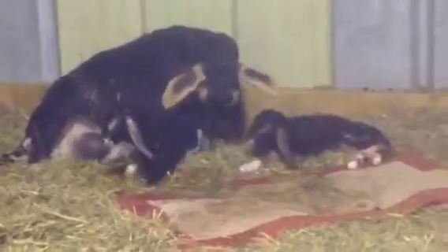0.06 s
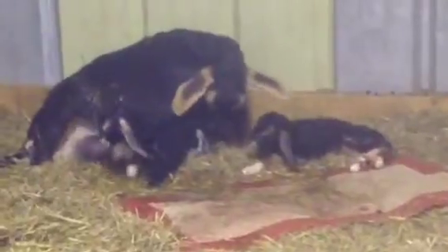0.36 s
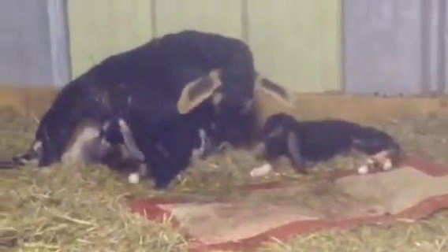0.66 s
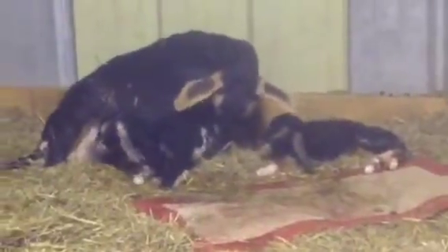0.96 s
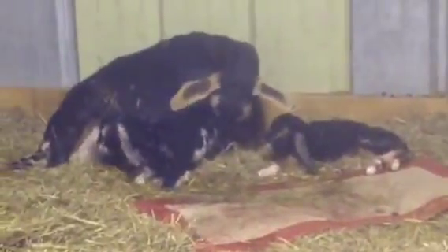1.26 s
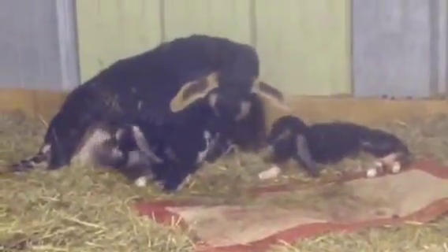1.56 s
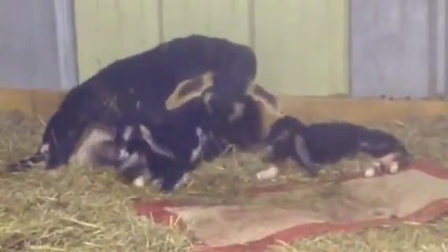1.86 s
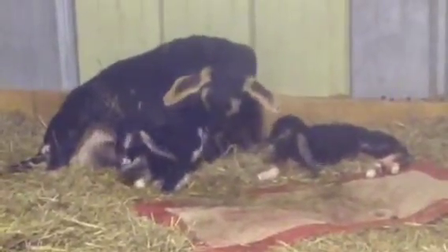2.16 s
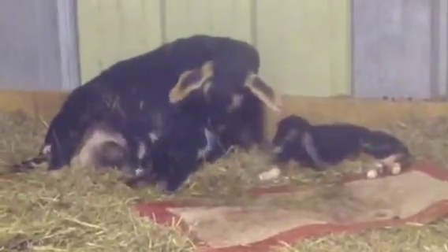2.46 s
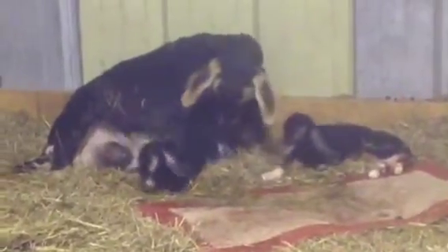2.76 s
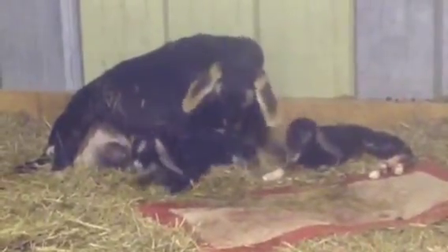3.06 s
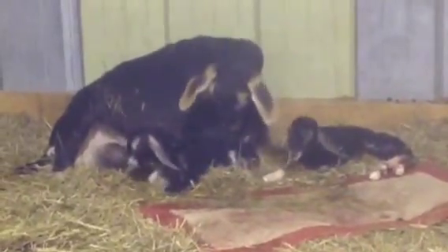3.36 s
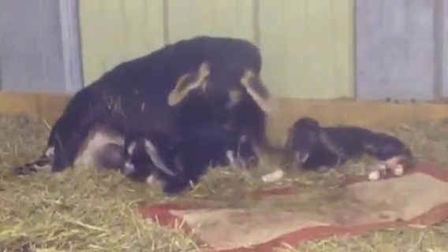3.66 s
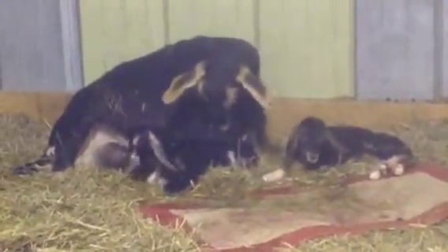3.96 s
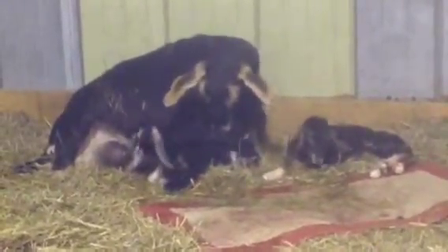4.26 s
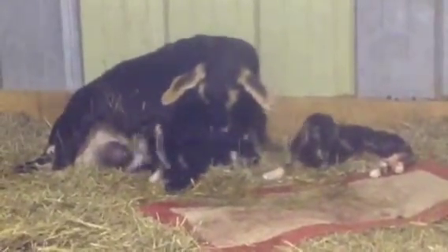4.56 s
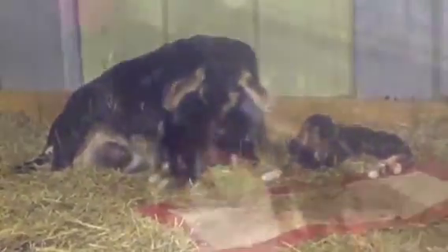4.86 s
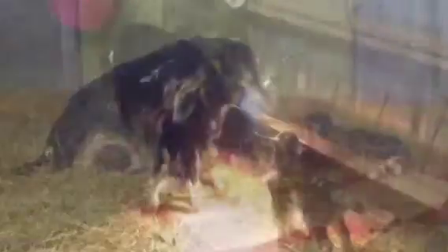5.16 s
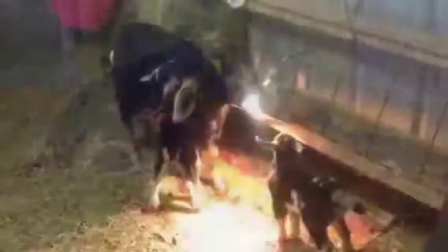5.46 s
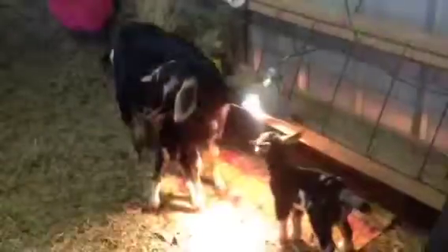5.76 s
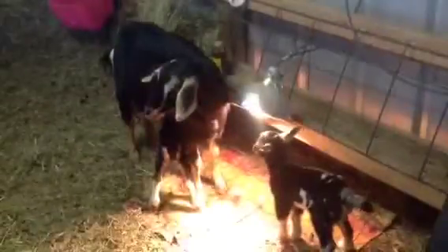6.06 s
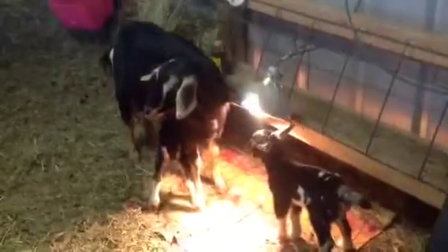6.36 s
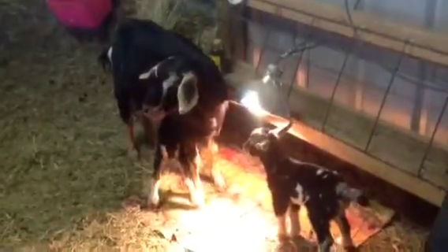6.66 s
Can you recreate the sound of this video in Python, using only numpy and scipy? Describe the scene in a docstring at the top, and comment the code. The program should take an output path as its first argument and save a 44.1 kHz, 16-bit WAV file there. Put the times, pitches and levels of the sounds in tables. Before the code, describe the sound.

A mother goat murmurs soft bleats and licks in straw while distant frogs peep; then louder barn air swells and a small bell clinks.

```python
"""A doe murmurs to her newborn kids in a straw-bedded barn pen: short, throbbing, mostly closed-mouth
bleats, glottal pulses ringing her throat, muzzle and nose. In the pen, licks smack, straw snaps and
hooves shift; far off outside, a chorus of frogs peeps. Then a louder, rustling barn air with a faint
hum swells up, and a clapper clinks four times on a small metal bell. One small microphone hears it all."""
import sys
import numpy as np
from scipy import signal
from scipy.fft import rfft, irfft, next_fast_len
from scipy.io import wavfile
from scipy.ndimage import uniform_filter1d

SR = 44100
rng = np.random.default_rng(int(sys.argv[2]) if len(sys.argv) > 2 else 0)


def generate_wav(sig):
    """Save sig (samples, or channels by samples) to the path in sys.argv[1] as 16-bit PCM at SR."""
    pcm = np.round(np.clip(np.atleast_2d(sig).T, -1, 1) * 32767).astype(np.int16)
    wavfile.write(sys.argv[1], SR, pcm)


N = 296335
TIME = np.arange(N) / SR
BUSY_FROM_S, BUSY_RISE_S = 4.719, 0.74   # the louder barn air swells up evenly, then stays

# Throbs of the doe's voice: t/s, push length/s, f/Hz, glide/(octaves per s), roughness/0-1,
# jaw opening/0-1, relative level/dB of nose, mouth and muzzle, muzzle resonance/Hz
THROBS = [(0.608, 0.054, 163.3, -3, 0.46, 0.04, -49, -50, -61, 5170),
          (.733, 0.042, 194.7, -0.8, 0.16, 0.23, -42.5, -46, -61.5, 5200),
          (0.858, 0.012, 193.6, 0.5, 0.46, 0, -49, -53.5, -76.5, 5400),
          (2.342, 0.018, 114.4, 0, 0.31, 0.37, -60.5, -68, -81, 5480),
          (2.388, 0.041, 106.8, -3, 0.66, 0.4, -55, -58.5, -71, 5370),
          (2.656, 0.047, 164.9, -1.14, 0.48, 1, -73, -66, -72, 5800),
          (2.748, 0.049, 118.1, 0.1, .42, 1, -66.5, -59, -61, 5406),
          (2.801, .048, 120.5, 0, .45, 0.79, -65.5, -60.5, -66.5, 5554),
          (2.85, .05, 170.2, 0.5, .42, 0.76, -58, -53.5, -60.5, 5200),
          (2.952, .063, 169, -.5, 0.5, 0.9, -57, -51, -62.5, 5000),
          (6.660, 0.024, 205.3, 0, 0.41, 0.89, -65, -48, -61, 5506),
          (6.693, 0.025, 201.2, -1.5, 0.13, 0.01, -38, -48, -67, 5370)]


def from_db(db):
    """Decibels to gain."""
    return np.exp(np.asarray(db) * (np.log(10) / 20))


def unit_rms(x):
    """Scale to unit rms."""
    return x / np.sqrt(np.mean(x ** 2) + 1e-20)


def hold_level(x, size=1200, floor=1e-12):
    """Hold a signal near unit rms over a sliding window of samples."""
    return x / np.sqrt(uniform_filter1d(x * x, size=size) + floor)


def ramp(start_s, length_s):
    """Rise evenly from zero to one."""
    return np.clip((TIME - start_s) / length_s, 0, 1)


def swell(middle_s, half_s, db):
    """A gain that rises and falls smoothly about a moment."""
    return from_db(db) * np.exp(-((TIME - middle_s) / half_s) ** 2)


def drift(rate_hz):
    """Smooth random wander of spread one."""
    knots = rng.standard_normal(int(N / SR * 400) + 2)
    slow = signal.sosfiltfilt(signal.butter(2, rate_hz, fs=400, output="sos"), knots, padtype="even")
    return np.interp(TIME, np.arange(len(slow)) / 400, unit_rms(slow))


def band(x, low_hz, high_hz, order):
    """Butterworth band-pass."""
    edges = [low_hz, min(high_hz, .45 * SR)]
    return signal.sosfilt(signal.butter(order, edges, "band", fs=SR, output="sos"), x)


def resonate(x, hz, width_hz):
    """A resonance with gain one at its peak."""
    r = np.exp(-np.pi * width_hz / SR)
    feedback = [1, -2 * r * np.cos(2 * np.pi * hz / SR), r * r]
    return signal.lfilter(np.array([1, 0, -1]) * (1 - r * r) / 2, feedback, x)


def noise(spectrum):
    """Noise of unit rms shaped by rows of f/Hz, level/dB, falling away past their ends."""
    hz, db = np.transpose(spectrum)
    size = next_fast_len(N, real=True)
    f = np.maximum(np.arange(size // 2 + 1) * SR / size, 1)
    skirts = 1 / np.sqrt((1 + (hz[0] / f) ** 8) * (1 + (f / hz[-1] / 1.1) ** 16))
    shape = from_db(np.interp(np.log(f), np.log(hz), db))
    return unit_rms(irfft(rfft(rng.standard_normal(size)) * skirts * shape, size)[:N])


def add(out, s, sound):
    """Mix a sound in at a time."""
    at = round(s * SR)
    out[at:at + len(sound)] += sound[:N - at]


def pen(x, wet_db, t60=0.14):
    """Boards and straw scatter the sound into a tail behind the direct path."""
    t = TIME[:SR // 2]
    tail = band(rng.standard_normal(len(t)), 120, 4500, order=1) * from_db(-60 * t / t60) * (t > .002)
    return x + from_db(wet_db) * signal.oaconvolve(x, tail / np.linalg.norm(tail))[:N]


def board_echoes(x, bounce):
    """Quick echoes between the nearest boards spread each pulse in time without colouring it."""
    # Echoes off the boards: delay/s
    delays = (.0023, .0037, .0059)
    size = next_fast_len(N + SR // 4, real=True)
    spectrum = rfft(x, size)
    for s in delays:
        delay = np.exp(-2j * np.pi * np.arange(len(spectrum)) * round(s * SR) / size)
        spectrum = spectrum * (delay - bounce) / (1 - bounce * delay)
    return irfft(spectrum, size)[:N]


def still_air(gain_db=3.5):
    """Room tone of the quiet barn, in which a dull low rush swells once."""
    # Course of the room tone, in three stretches: t/s, level/dB before gain_db
    levels = [
        [(0.0, -66.5), (0.55, -68.5)],
        [(1.0, -67), (1.466, -70), (2.3, -71.5)],
        [(3.2, -70.5), (3.608, -68.5), (4.7, -71)],
    ]
    # Spectrum of the room tone: f/Hz, relative level/dB
    spectrum = [(30, -25), (60, -18.5), (100, -14.5), (150, -1), (260, -2.5), (450, -7), (900, -10.5),
                (1800, -12.5), (3500, -15), (7000, -19.5), (15000, -24.5)]
    # The low rush: middle t/s, half-length/s, level/dB
    rush = (3.82, 0.31, -70.5)
    s, db = np.vstack(levels).T
    tone = from_db(np.interp(TIME, s, db) + gain_db) * noise(spectrum)
    return tone + swell(*rush) * noise([(220, 0), (400, -3), (600, -10)])


def busy_air(rumble_db=-51, rustle_db=-50.5):
    """The louder barn air swells up: an uneven rumble under a flickering rustle."""
    # Spectrum of the rumble: f/Hz, relative level/dB
    rumble_spectrum = [(24, -62), (40, -34), (92, -10), (163, 0), (259, -1.5), (371, -8), (429, -8),
                       (503, -7), (622, -9), (950, -15), (1240, -20), (2090, -120)]
    # Spectrum of the rustle: f/Hz, relative level/dB
    rustle_spectrum = [(530, -14), (900, -4.5), (1590, -3), (1710, -6), (1850, -5), (2380, -6.5),
                       (2780, -4.5), (3320, -7), (14600, -4), (15300, -2.5)]
    rumble = from_db(rumble_db + drift(9.9)) * noise(rumble_spectrum)
    rustle = from_db(rustle_db + 0.77 * drift(37)) * noise(rustle_spectrum)
    return (rumble + rustle) * ramp(BUSY_FROM_S, BUSY_RISE_S)


def hum(hz=284, level_db=-55.5, end_s=5.62, fade_s=0.058):
    """A faint pitched hum that swells with the barn air, wavers and stops."""
    # Partials of the hum: harmonic number, relative level/dB
    partials = [(1, 0), (2, -13), (3, -6), (6, -9)]
    pitch = hz * (1 + 0.00616 * drift(2.94) + 0.0052 * drift(23.5))
    phase = 2 * np.pi * np.cumsum(pitch) / SR
    envelope = np.sqrt(ramp(BUSY_FROM_S, BUSY_RISE_S)) * (1 - ramp(end_s - fade_s, fade_s))
    return from_db(level_db) * envelope * sum(from_db(db) * np.sin(k * phase) for k, db in partials)


def frogs(count=900, centre_hz=2800, peep_s=.11, level_db=-61.5, fade_s=0.65):
    """Far outside, frogs peep in short rising whistles, blurred by distance; they fade as the air swells."""
    peeps, t = np.zeros(N), TIME[:round(peep_s * SR)]
    waver = drift(126)
    rise = 0.0757 * (t / peep_s - .5)
    arch = np.sin(np.pi * t / peep_s)
    draws = np.hstack([rng.random((count, 2)), rng.standard_normal((count, 2))])
    for k, (when, place, pitch, size) in enumerate(draws):
        wobble = waver[int(place * (N - len(t))):][:len(t)]
        hz = centre_hz * (1 + 0.102 * np.tanh(pitch / 2) + rise + 0.01587 * wobble)
        peep = from_db(3.5 * size) * arch * np.sin(2 * np.pi * np.cumsum(hz) / SR)
        add(peeps, (k + when) / count * (N / SR - peep_s), peep)
    distant = np.roll(pen(peeps, wet_db=7, t60=1.0), -SR // 4)   # already ringing at the start
    chorus = hold_level(distant, size=6000, floor=1e-6)
    return chorus * from_db(level_db + 1.67 * drift(11)) * (1 - ramp(BUSY_FROM_S, fade_s))


def straw_bed(level_db=-76):
    """The bedding crackles faintly throughout, louder where the animals stir it."""
    # Stirs in the straw: middle t/s, half-length/s, level/dB
    stirs = [(2.911, 0.083, -69.5), (3.05, .07, -71), (3.269, 0.09, -82), (4.274, 0.032, -75),
             (5.705, .07, -46.5)]
    envelope = sum(swell(*stir) for stir in stirs) + from_db(level_db + 2.5 * drift(12))
    flicker = from_db(0.96 * drift(51))
    return envelope * flicker * noise([(1500, -5), (5000, -8), (15000, -5)])


def contacts(events, t60, sharpness, grain_db, gain_db, cavity_db=-40):
    """Each contact is a dying cluster of tiny slips through a broad resonance; a cavity adds a ring."""
    out, t = np.zeros(N), TIME[:SR // 5]
    for s, db, hz in events:
        slips, sizes = rng.standard_normal((2, len(t)))
        slips = slips * from_db(grain_db * sizes) * from_db(-60 * t / t60)
        burst = resonate(slips, hz, hz / sharpness) + from_db(cavity_db) * resonate(slips, hz, hz / 14)
        burst = band(burst, hz / 2, hz * 2, order=1)
        add(out, s, from_db(db + gain_db) * burst / np.abs(burst).max())
    return out


def hooves():
    """Hooves shift in the bedding with low, grainy scuffs."""
    # Hoof contacts: t/s, peak level/dB before gain_db, f/Hz
    steps = [(4.545, -53.5, 630), (5.05, -48, 298), (5.424, -49, 290), (5.465, -38, 510),
             (5.53, -38.5, 600), (5.974, -37.5, 170), (6.04, -43.5, 129), (6.458, -45.5, 191)]
    return contacts(steps, t60=0.062, sharpness=2.1, grain_db=10.5, gain_db=-2.0)


def straw_snaps():
    """Single straws break with short, bright cracks."""
    # Breaking straws: t/s, peak level/dB before gain_db, f/Hz
    snaps = [(0.3311, -60, 4900), (0.8792, -50.5, 3280), (1.4401, -57, 3400), (2.153, -64, 3310),
             (3.8466, -52.5, 3500), (4.258, -57, 3300), (4.8858, -52.5, 3540)]
    return contacts(snaps, t60=0.043, sharpness=1.3, grain_db=6.0, gain_db=3.5)


def licks(soft_count=8, soft_db=-62.5, soft_hz=1610):
    """Wet licks ring the mouth cavity; fainter ones come at loose intervals while the barn is still."""
    # Tongue smacks: t/s, peak level/dB before gain_db, f/Hz
    smacks = [(0.3272, -54, 1630), (1.1886, -61, 1660), (1.2883, -53.5, 2060), (1.9503, -52.5, 1820),
              (2.3094, -55, 2410), (2.374, -52.5, 2370), (2.596, -61, 1406), (3.085, -55, 1572),
              (3.174, -54.5, 1430), (3.3159, -64, 2220), (3.4052, -58.5, 1510), (4.2857, -60, 1460),
              (4.7815, -57.5, 1590)]
    soft = []
    for k, (when, size, pitch) in enumerate(rng.random((soft_count, 3))):
        s = (k + when) / soft_count * BUSY_FROM_S
        soft.append((s, soft_db + 4 * (size - .5), soft_hz * 2 ** (.7 * (pitch - .5))))
    return contacts(smacks + soft, t60=0.095, sharpness=2.6, grain_db=5.5, gain_db=3.0, cavity_db=3.5)


def bell(tick_t60=0.078, tick_swell_s=0.0086, tick_gain_db=5):
    """The clapper buzzes briefly on the rim; modes swell and die, and the close lowest pair beats."""
    # Bell modes, in groups that a blow wakes together: f/Hz, relative level/dB, t60/s, swell/s
    groups = {"hum": [(1166, .3, .58, .005), (1175.6, .3, .4, .005)], "clang": [(1173, -3, .075, .035),
              (3066, -16, .2, .02)], "sing": [(2929, -44, 4.0, .02), (5363, -20, .5, .14)],
              "ping": [(5576, -42, .6, .005)], "ting": [(8210, -32, .26, .01), (14153, -25.5, .07, .037),
              (14524, -34, .11, .035)], "chink": [(8793, -26, .18, .022)],
              "sparkle": [(11375, -41.5, .21, .007), (11160, -40, .09, .019), (13324, -42, .13, .027),
              (13620, -52, .2, .004)]}
    # Clapper blows: t/s, relative level/dB of hum, clang, sing, ping, ting, chink, sparkle and tick
    blows = [(5.894, -37.5, 0.5, 0, 1, 1.5, -0.5, 1, -33), (5.937, -29, -44, -32, -6, -30, -30, -20, -65),
             (6.239, -30.5, -17, -32, 6, 2, -18, 8.5, -35),
             (6.411, -31.5, -19.5, -15.5, -7.5, 5, -17, -14, -60),
             (6.556, -31.5, -9, -26, 9, 4.5, 1.5, 5.5, -32)]
    out, t = np.zeros(N), TIME[:SR]
    for s, *group_dbs, tick_db in blows:
        for group_db, modes in zip(group_dbs, groups.values()):
            for k, (hz, mode_db, t60, swell_s) in enumerate(modes):
                envelope = from_db(group_db + mode_db - 60 * t / t60) * (1 - np.exp(-t / swell_s))
                add(out, s, (-1) ** k * envelope * np.sin(2 * np.pi * hz * t))
        envelope = from_db(tick_db + tick_gain_db - 60 * t / tick_t60) * (1 - np.exp(-t / tick_swell_s))
        add(out, s, envelope * band(rng.standard_normal(len(t)), 3600, .45 * SR, order=1))
    return out


def throat():
    """Pitch, roughness, jaw and muzzle resonance: each throb sets them anew, and its pitch glides."""
    s, length, hz, glide, rough, jaw, *_, muzzle_hz = np.transpose(THROBS)
    k = np.maximum(np.searchsorted(s, TIME) - 1, 0)   # the current throb
    from_push_end = np.clip(TIME - s[k] - length[k], -length[k], length[k] / 2)
    pitch = hz[k] * 2 ** (glide[k] * from_push_end)
    return [uniform_filter1d(curve, size=400) for curve in (pitch, rough[k], jaw[k], muzzle_hz[k])]


def pushes(attack_share=0.74, nose_lag_s=0.0038, nose_db_per_s=270, mouth_db_per_s=330):
    """Gains of nose, mouth and muzzle: each throb swells, holds while the push lasts and dies away."""
    powers, t = np.zeros((3, N)), TIME[:SR // 2]
    paths = [(nose_lag_s, nose_db_per_s), (0, mouth_db_per_s), (0, mouth_db_per_s)]
    for s, length, *_, nose_db, mouth_db, muzzle_db, _ in THROBS:
        attack = np.sin(np.pi / 2 * np.minimum(t / (attack_share * length), 1)) ** 2
        for power, db, (lag, release) in zip(powers, (nose_db, mouth_db, muzzle_db), paths):
            envelope = attack * from_db(db - release * np.maximum(t - length, 0))
            add(power, s + lag, envelope ** 2)
    return np.sqrt(powers)


def mouth_ring(source, jaw):
    """The throat and mouth ring; an opening jaw shifts the weight to the higher resonances."""
    # Throat resonances: f/Hz, width/Hz, relative level/dB with jaw shut and with jaw open
    formants = [(288, 61, -5, -12), (393, 50, 3.5, -6), (489, 65, 2.5, -5), (692, 83, -5.5, 2),
                (844, 95, -2.5, 4), (992, 60, 2.5, 7), (1213, 67, -11, -2.5), (1504, 130, -12, -5)]
    ring = sum((-1) ** k * from_db(shut + jaw * (wide - shut)) * resonate(source, hz, width)
               for k, (hz, width, shut, wide) in enumerate(formants))
    return hold_level(band(board_echoes(ring, bounce=0.48), 230, 2400, order=2))


def muzzle_buzz(source, top_hz, width_hz=1100):
    """The muzzle buzzes at steady resonances and a top one that glides as the lips move."""
    # Steady muzzle resonances: f/Hz, width/Hz, relative level/dB
    formants = [(2550, 860, 1), (3800, 690, -7), (4170, 200, -6)]
    carrier = np.exp(2j * np.pi * np.cumsum(top_hz) / SR)
    lowpass = signal.butter(2, width_hz / 2, fs=SR, output="sos")
    gliding = 2 * np.real(carrier * signal.sosfilt(lowpass, source / carrier))
    steady = sum(from_db(db) * resonate(source, hz, width) for hz, width, db in formants)
    return hold_level(band(board_echoes(gliding + steady, bounce=.3), 2320, 5870, order=6))


def doe(jitter=.08, shimmer=0.68, rasp=1.8, octave_db=-15):
    """Glottal pulses ring the mouth and muzzle; the lowest partials come cleanly through the nose."""
    pitch, rough, jaw, muzzle_hz = throat()
    cycles = np.cumsum(pitch * (1 + jitter * rough * drift(90))) / SR
    strength = np.exp(shimmer * rough * drift(115)) * np.sqrt(SR / pitch)
    pulses = np.diff(np.floor(cycles), prepend=0) * strength
    # air hisses through the folds once each cycle
    hiss = rasp * rough * rng.standard_normal(N) * np.exp(-3 * (cycles % 1))
    source = pulses + hiss
    nose = hold_level(band(resonate(source, hz=219, width_hz=53), 123, 280, order=3))
    nose += from_db(octave_db) * (1 - jaw) * np.sin(4 * np.pi * cycles)
    mouth = from_db(-0.26) * mouth_ring(source, jaw)
    muzzle = from_db(3.0) * muzzle_buzz(source, muzzle_hz)
    nose_gain, mouth_gain, muzzle_gain = pushes()
    return band(nose * nose_gain + mouth * mouth_gain + muzzle * muzzle_gain, 100, 14000, order=3)


def scene():
    """The pen, the barn air and the far frogs reach one microphone, the same on both channels."""
    movements = licks() + straw_snaps() + hooves()
    foreground = pen(doe(), wet_db=-20.5) + pen(movements, wet_db=-13) + bell()
    background = frogs() + still_air() + straw_bed() + busy_air() + hum()
    mono = foreground + background
    return np.array([mono, mono])


def record(dry):
    """The small microphone loses the deep bass; the top is cut steeply."""
    thin = signal.sosfilt(signal.butter(1, 60, "high", fs=SR, output="sos"), dry)
    return signal.sosfilt(signal.ellip(12, .1, 80, 15300, fs=SR, output="sos"), thin)


dry = scene()
out = record(dry)
generate_wav(out)
```